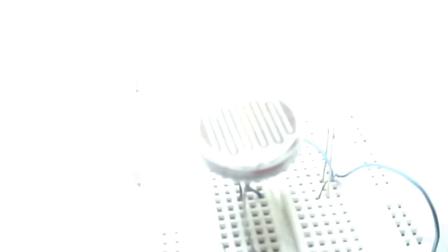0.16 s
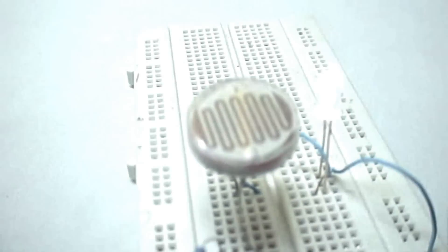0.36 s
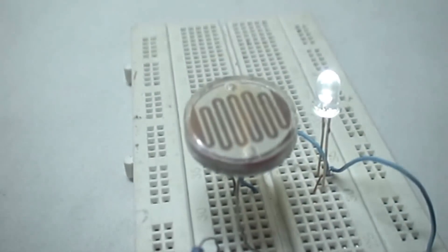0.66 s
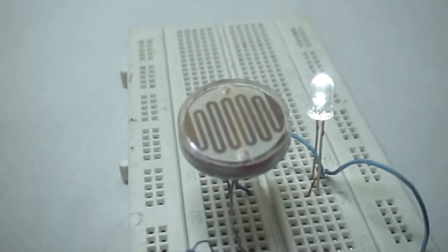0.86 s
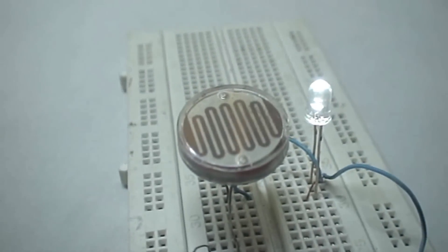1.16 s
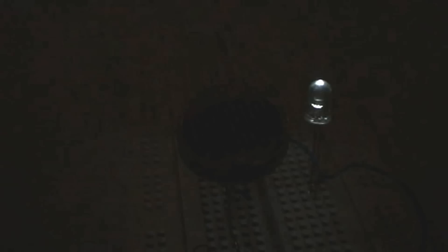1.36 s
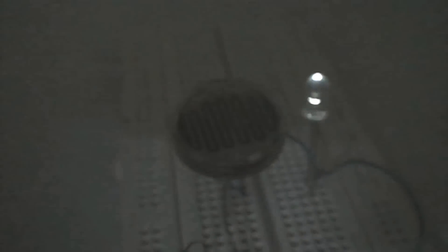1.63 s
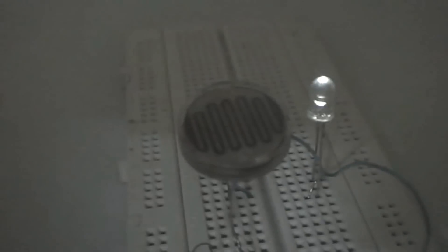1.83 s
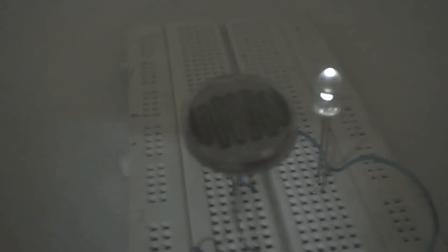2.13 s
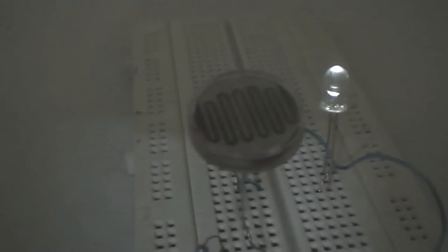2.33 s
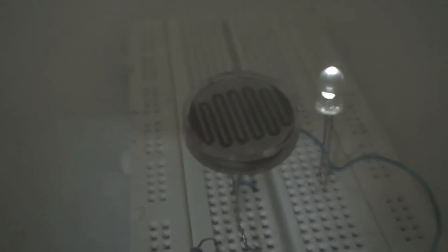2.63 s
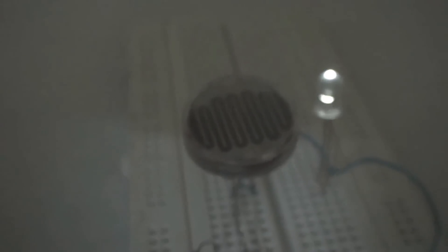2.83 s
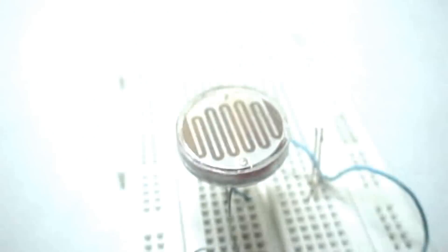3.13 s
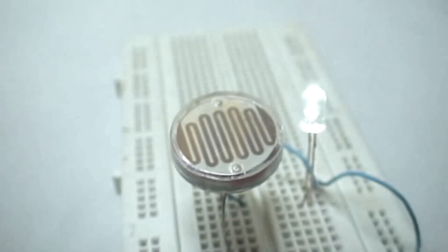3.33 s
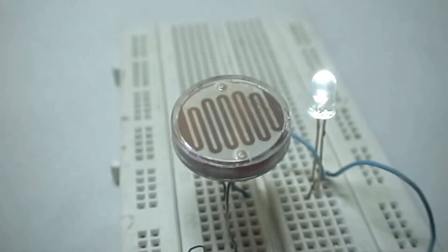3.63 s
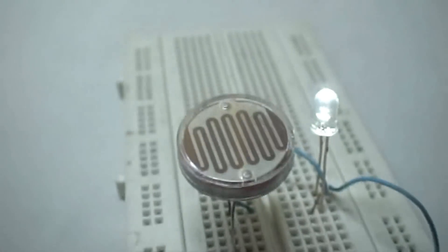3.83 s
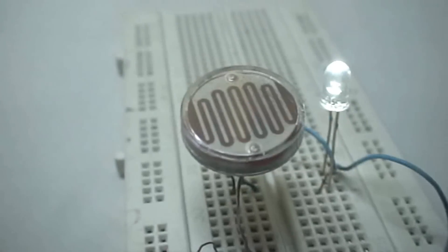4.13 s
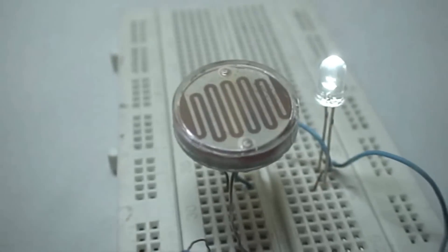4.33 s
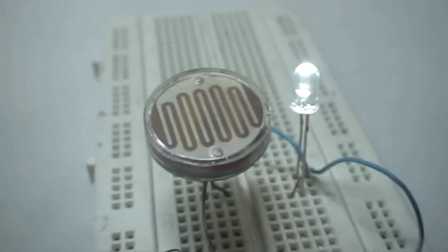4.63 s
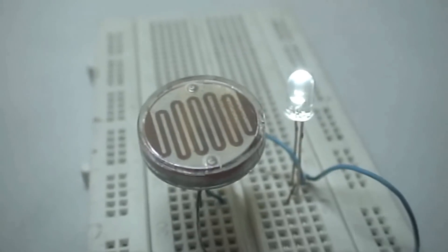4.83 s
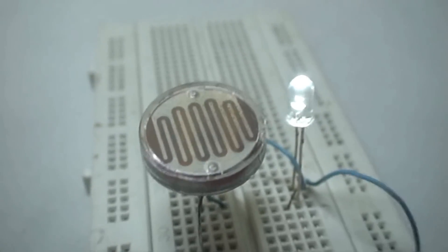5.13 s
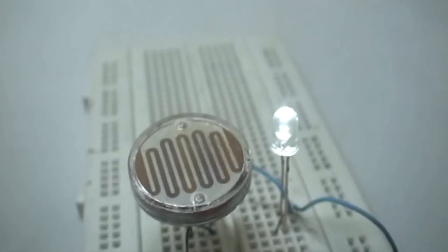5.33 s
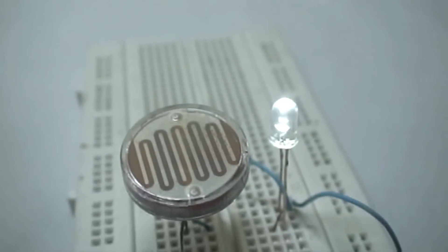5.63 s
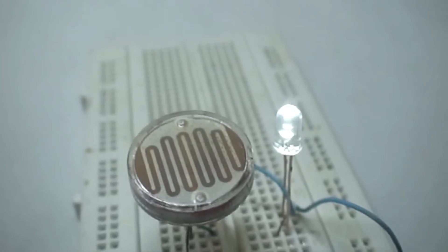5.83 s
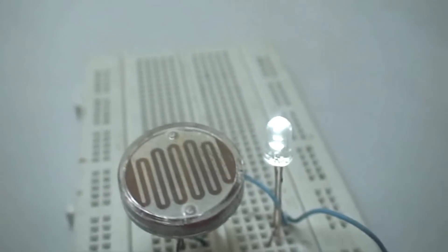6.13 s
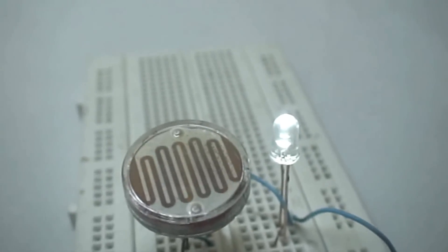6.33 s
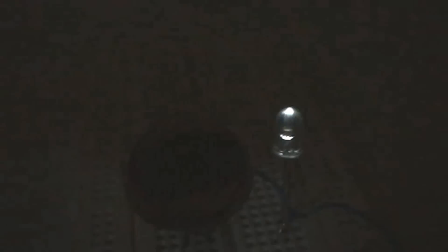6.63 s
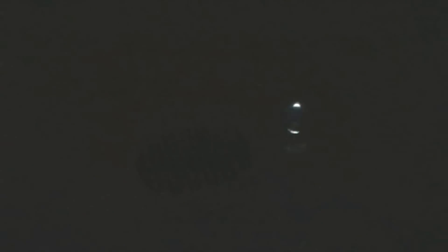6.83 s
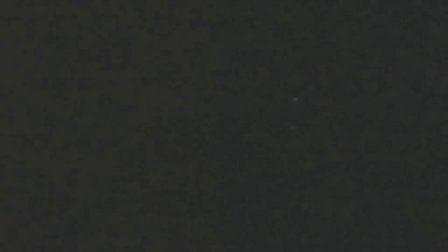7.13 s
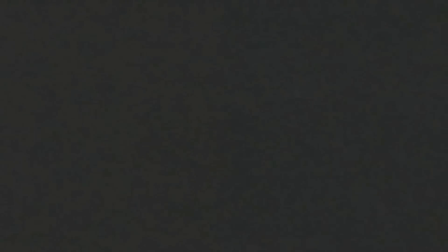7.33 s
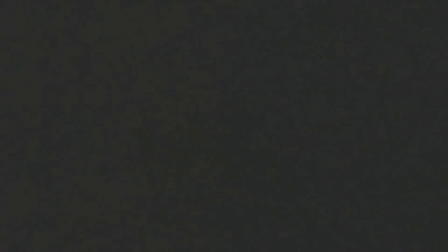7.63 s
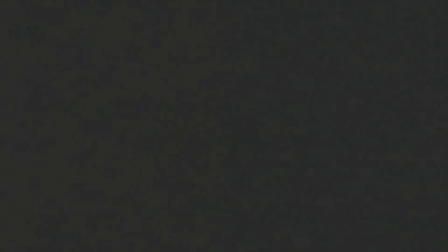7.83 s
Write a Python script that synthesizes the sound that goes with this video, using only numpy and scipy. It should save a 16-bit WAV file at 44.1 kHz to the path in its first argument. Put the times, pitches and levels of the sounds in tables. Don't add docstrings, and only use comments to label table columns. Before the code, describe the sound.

In a quiet hissy room, a nearby switch snaps sharply on and eases off, while farther wall clicks echo amid small desk knocks.

```python
import sys
import numpy as np
from scipy import signal
from scipy.fft import rfft, irfft, next_fast_len
from scipy.io import wavfile
from scipy.ndimage import uniform_filter1d

SR = 44100
rng = np.random.default_rng(int(sys.argv[2]) if len(sys.argv) > 2 else 0)


def wav_out(sig):
    wavfile.write(sys.argv[1], SR, np.round(np.clip(np.atleast_2d(sig).T, -1, 1) * 32767).astype(np.int16))


def natural_amplitude(level_db):
    exponent = np.asarray(level_db, float) / 20
    return 10 ** exponent


N = 352359

# (time [s], level [dB])
HISS_SWELL = [(0, 2.5), (1.5, 1), (2.9, 2.5), (4.2, 0), (5.5, 1.5), (7.5, 2.5)]
# (frequency [Hz], level [dB per Hz])
ROOM_TONE = [(25, -23), (76, -19), (130, 0.5), (200, -8.5), (300, -6.5), (575, -7.5), (1500, -14.5),
             (16000, -40)]
# (frequency [Hz], level [dB per Hz])
MIC_NOISE = [(2000, -40.5), (7000, -28.5), (11000, -29.5), (15800, -26.5)]
# (frequency [Hz], width [Hz], level [dB rms])
ROOM_MODES = [(61.5, 38, -74.5), (97.5, 6.5, -71), (129.5, 12, -69), (194, 4.4, -70.5), (600, 85, -70)]
# (frequency [Hz], likeness [0-1])
HISS_LIKENESS = [(100, 1), (220, 0.48), (400, 0.99), (650, 0.52), (1000, .32), (2000, 0.42), (5000, 0.11),
                 (9000, .03)]
# (frequency [Hz], likeness [0-1])
CLICK_LIKENESS = [(300, 1), (2000, 0.62), (5000, 0.91), (9000, 0.43), (14000, 0.19)]
# (frequency [Hz], time to fall 60 dB [s])
ROOM_DECAY = [(250, 0.44), (660, 0.3), (1740, 0.36), (4590, 0.34), (12100, 0.27)]

# (time [s], slot whine [Hz])
FAN_SPEED = [(0, 1422), (.5, 1427), (1.4, 1424), (1.65, 1438), (2.1, 1423), (2.55, 1430), (2.95, 1416),
             (3.2, 1432), (3.7, 1417), (3.95, 1429), (4.25, 1432), (4.95, 1420), (5.33, 1443), (5.75, 1426),
             (6.0, 1423), (6.25, 1433), (7.0, 1423), (7.99, 1425)]
# (multiple of the shaft speed [-], level [dB])
FAN_ORDERS = [(36, 0.5), (37, -7.5), (360, -15)]
# (time [s], hum [Hz], level [dB rms])
VEHICLE = [
    (4.9, 163, -78),
    (5.5, 163.8, -62),
    (6.2, 163.7, -63.5),
    (6.7, 168, -62),
    (7.1, 185.4, -66.5),
    (7.6, 199.2, -76),
    (7.99, 200, -72),
]

# (time [s], peak [dB], centre [Hz], left minus right [dB])
TICKS = [(.2712, -43, 4440, .5), (1.046, -54, 3370, 4), (1.047, -44, 1780, 1), (1.6442, -50.5, 2400, -1),
         (2.9447, -46, 1990, 7), (3.009, -46, 5000, 9), (3.5486, -44, 1290, -1), (6.8004, -38, 3300, 1),
         (6.8, -33.5, 1330, 1), (7.9688, -44.5, 900, 3)]
# (time [s], peak [dB], centre [Hz], left minus right [dB])
PINGS = [
    (.158, -27, 14000, 5),
    (.2712, -37.5, 1570, .5),
    (3.137, -41, 13000, 0),
    (4.056, -50, 816, -4),
    (5.313, -58, 5400, -4),
]
# (time [s], peak [dB], pitch [Hz], time to fall 60 dB [s], left minus right [dB])
SQUEAKS = [
    (2.168, -65, 4900, 0.26, 2),
    (2.27, -69, 6200, .1, 2),
    (3.5478, -47.5, 3600, .04, 5),
    (5.266, -63, 5150, .04, -6),
]
# (time [s], peak [dB], start [Hz], end [Hz], time to fall 60 dB [s])
KNOCKS = [
    (0.274, -44.5, 348, 350, 0.1),
    (3.068, -42, 300, 300, .06),
    (6.584, -41, 320, 340, 0.045),
    (6.732, -31, 368, 280, 0.061),
    (6.74, -37.5, 198, 165, 0.071),
    (6.807, -32.5, 392, 470, 0.046),
    (6.812, -43, 600, 600, .06),
]

# (time [s], peak [dB], finger lands earlier by [s], direct sound [dB])
WALL = [
    (4.408, -25, 0.006, -2),
    (5.8117, -19, 0.0044, -18),
    (6.9328, -28, 0.0074, -12),
]
# (frequency [Hz], level [dB per Hz])
WALL_COLOUR = [
    [(150, -35), (400, 0), (3000, -4), (4150, -30), (5500, -1.5), (13500, -24), (15000, -38)],
    [(100, -12), (180, 1.5), (1000, -3.5), (5000, -5), (10000, -1.5), (16000, -10)],
    [(150, -35), (500, 2), (3000, -4), (6500, -8), (13000, -19), (15000, -30)],
]
# (frequency [Hz], width [Hz], level [dB])
WALL_RINGS = [
    [(340, 58, 3), (1360, 370, 1), (2160, 270, 4.5), (2700, 110, 4.5), (3483, 310, 7), (4800, 310, -2),
     (6900, 700, -5.5), (8540, 560, 3.5), (9440, 540, -1), (12600, 1400, -11)],
    [(340, 25, 0), (620, 82, -1), (1380, 160, -1.5), (2160, 1100, -1.5), (3300, 990, -6), (4400, 700, -2),
     (6500, 1100, -4), (8860, 1400, -4), (12800, 1600, -13.5)],
    [(1460, 350, 1), (2320, 250, 4), (2910, 420, 4.5), (3880, 340, 1.5), (5300, 420, -7.5), (8400, 1100, 3),
     (9500, 390, -2), (12600, 1000, -9)],
]
# (frequency [Hz], width [Hz], depth [0-1])
WALL_NOTCH = [
    (4150, 330, .92),
    (5500, 300, .2),
    (4670, 360, 0.53),
]

# (time [s], peak [dB], left minus right [dB])
LAMP_ON = [
    (0.1601, -8, 2),
    (3.017, -6.5, 3),
]
# (frequency [Hz], level [dB per Hz])
LAMP_ON_COLOUR = [
    [(400, -41), (800, -19), (4000, -5), (5500, -12), (7000, -10), (16000, -12.5)],
    [(400, -31), (800, -3.5), (4000, -17), (5800, -7), (9000, -10), (16000, -8)],
]
# (frequency [Hz], width [Hz], level [dB])
LAMP_ON_RINGS = [
    [(1170, 550, -3.5), (2870, 860, -5.5), (4900, 670, 0.5), (6780, 520, -2), (8700, 600, -9),
     (10230, 660, -5), (13000, 560, -1.5), (14200, 500, -10)],
    [(1420, 340, -2.5), (2770, 300, 0.5), (3600, 430, -5.5), (4700, 690, -1.5), (7000, 760, -5.5),
     (10270, 300, 3), (13300, 650, -5), (14400, 360, -27.5)],
]
# (frequency [Hz], width [Hz], depth [0-1])
LAMP_ON_NOTCH = [
    (5850, 620, 0.8),
    (5820, 400, 0.7),
]
# (time [s], peak [dB], left minus right [dB])
LAMP_OFF = [
    (1.4177, -35.5, 2.2),
    (6.6976, -29, 1.7),
]
# (frequency [Hz], level [dB per Hz])
LAMP_OFF_COLOUR = [(400, -17), (800, -20), (2200, 0.5), (5000, -25), (16000, -23)]
# (frequency [Hz], width [Hz], level [dB])
LAMP_OFF_RINGS = [(980, 170, -2.5), (1850, 600, 2.5), (3600, 1300, -12), (6580, 560, -8.5),
                  (8700, 700, -12), (12700, 1500, -30)]
# (frequency [Hz], level [dB], time to fall 60 dB [s])
LAMP_BODY = [(72.6, -8.5, 0.37), (141, -1.5, 0.1), (163, -24.5, 0.79), (267, -9.5, 0.18), (345, -2.5, 0.11),
             (416, -2, 0.13), (734, -16, 0.28)]

# (frequency [Hz], lead [radians])
MIC_LEAD = [(30, 0.18), (100, 0.36), (220, 0.92), (400, 1.75), (1000, 1.79), (3000, 1.54), (5500, 0.84),
            (10000, 0.75)]
# (frequency [Hz], left minus right [dB])
MIC_BALANCE = [(60, -4), (250, 1), (4000, -1), (11000, -0.7)]


def evened(x):
    return x / np.sqrt(np.mean(x ** 2) + 1e-20)


def peaked(x):
    return x / np.abs(x.mean(0)).max()


def read(points, hz):
    f, value = np.transpose(points)
    return np.interp(np.log(hz + 1), np.log(f + 1), value, left=value[0], right=value[-1])


def follow(rows):
    s, *columns = np.transpose(rows)
    return [np.interp(np.arange(N) / SR, s, c) for c in columns]


def add(mix, s, sound):
    part = mix[:, round(s * SR):][:, :sound.shape[1]]
    part += sound[:, :part.shape[1]]


def panned(x, pan_db):
    return x * natural_amplitude(np.array([[pan_db / 2], [-pan_db / 2]]))


def paired(x, likeness):
    c = np.clip(read(likeness, np.fft.rfftfreq(x.shape[1], 1 / SR)), 0, 1)
    left, other = rfft(x, axis=1)
    right = c * left + np.sqrt(1 - c ** 2) * other
    return irfft(np.array([left, right]), x.shape[1], axis=1)


def wander(size):
    once = uniform_filter1d(rng.standard_normal(N), size=size)
    return evened(uniform_filter1d(once, size=size))


def coloured(x, colour, rings, valley_db):
    hz = np.abs(np.fft.fftfreq(4096, 1 / SR))
    peaks = sum((natural_amplitude(db) / (1 + 2 * ((hz - f) / w) ** 2)) ** 2 for f, w, db in rings)
    broad = natural_amplitude(np.maximum(read(colour, hz) + valley_db, -90)) ** 2
    log_gain = np.log(broad + peaks) / 2
    phase = signal.hilbert(log_gain).imag
    taps = np.fft.ifft(np.exp(log_gain - 1j * phase)).real[:2048]
    return signal.fftconvolve(x, taps[None], axes=1)


def notched(x, hz, width, depth):
    band = signal.lfilter(*signal.iirpeak(hz, hz / width, fs=SR), x, axis=1)
    return x - np.clip(depth, 0, 1) * band


def rattle(t60, rise):
    t = np.arange(6000) / SR
    spikes = natural_amplitude(2.5 * rng.standard_normal(6000))
    noise = paired(rng.standard_normal((2, 6000)), CLICK_LIKENESS) * spikes
    z = rfft(noise * (1 - np.exp(-t / rise)) * natural_amplitude(-60 * t / t60), axis=1)
    z = z / np.sqrt(uniform_filter1d(np.abs(z) ** 2, size=70, axis=1))
    fade_out = np.clip((t[-1] - .01 - t) / .02, 0, 1)
    return evened(irfft(z, 6000, axis=1) * fade_out)


def ring(hz, end_hz, t60, rise):
    t = np.arange(20000) / SR
    glide = end_hz + (hz - end_hz) * np.exp(-t / 0.028)
    return np.sin(2 * np.pi * np.cumsum(glide) / SR) * natural_amplitude(-60 * t / t60) * (1 - np.exp(-t / rise))


def room(gap, build):
    noise = paired(rng.standard_normal((2, 30000)), CLICK_LIKENESS)
    hz, t, z = signal.stft(noise, SR, nperseg=128)
    rise = 1 - np.exp(-(t + 0.0013) / (build * (1 + 2500 / (hz[:, None] + 300))))
    clumps = uniform_filter1d(rng.standard_normal(z.shape[1:]), size=4, axis=0)
    clumps_db = 2 * evened(uniform_filter1d(clumps, size=3, axis=1))
    decay = natural_amplitude(-60 * t / read(ROOM_DECAY, hz)[:, None])
    tail = signal.istft(z * rise * natural_amplitude(clumps_db) * decay, SR, nperseg=128)[1]
    return np.pad(tail / np.linalg.norm(tail[0]), ((0, 0), (round(gap * SR), 0)))


def hiss():
    hz = np.fft.rfftfreq(N, 1 / SR)
    colour = np.hypot(natural_amplitude(read(ROOM_TONE, hz)), natural_amplitude(read(MIC_NOISE, hz))) * (hz < 15880)
    air = irfft(rfft(rng.standard_normal((2, N)), axis=1) * colour, N, axis=1)
    air = natural_amplitude(-58.5) * evened(paired(air, HISS_LIKENESS))
    for f, width, db in ROOM_MODES:
        r = np.exp(-np.pi * width / SR)
        poles = [1, -2 * r * np.cos(2 * np.pi * f / SR), r * r]
        air = air + natural_amplitude(db) * evened(signal.lfilter([1, 0, -1], poles, rng.standard_normal(N)))
    return natural_amplitude(follow(HISS_SWELL)[0]) * air


def fan():
    t = np.arange(N) / SR
    hunt_hz, hunts_per_s = 2.2, 2.6
    slot_hz = follow(FAN_SPEED)[0] + hunt_hz * np.cos(2 * np.pi * hunts_per_s * (t - .5))
    shaft = 2 * np.pi * np.cumsum(uniform_filter1d(slot_hz / 36, size=3000)) / SR
    fan_db = -71 + 0.87 * wander(5000)
    lag = np.array([[0], [.6]])
    whine = sum(natural_amplitude(fan_db + db) * np.sin(round(k) * shaft + lag) for k, db in FAN_ORDERS)
    whistle = natural_amplitude(-88.5) * np.sin(2 * np.pi * 14310 * t)
    return np.sqrt(2) * (panned(whine, 9.5) + whistle)


def vehicle():
    hz, db = follow(VEHICLE)
    flutter_db = 2 * wander(3000)
    return np.sqrt(2) * natural_amplitude(db + flutter_db) * np.sin(2 * np.pi * np.cumsum(hz) / SR)


def sleeve(mix):
    length_s, rise_s = .22, 0.068
    t = np.arange(0, length_s, 1 / SR)
    hz = 1780 + 386 * np.minimum(t / (2 * rise_s), 1)
    cloth = uniform_filter1d(rng.standard_normal((2, 20000)), size=70, axis=1)[:, :len(t)]
    turning = np.exp(2j * np.pi * np.cumsum(hz) / SR)
    whisper = evened((turning * (cloth[0] + 1j * cloth[1])).real)
    stroke = np.minimum(t / rise_s, 1) ** 2 * np.minimum((length_s - t) / .02, 1)
    add(mix, 4.2, natural_amplitude(-64.5) * stroke * whisper * np.ones((2, 1)))


def tick(mix, s, db, hz, width, t60, pan_db):
    touch = rattle(t60, 0.00059)
    touch[:, 8] += 12.
    sound = coloured(touch, [(100, -40), (800, -3), (16000, -18)], [(hz, width, 0)], valley_db=-23)
    add(mix, s, panned(natural_amplitude(db) * peaked(sound), pan_db))


def fingers(mix):
    for rows, spread in ((TICKS, 1.05), (PINGS, 0.31)):
        for s, db, hz, pan_db in rows:
            t60 = 0.058 / (1 + (hz / 9000) ** 2)
            tick(mix, s, db, hz, spread * hz, t60, pan_db)
    for s, db, hz, t60, pan_db in SQUEAKS:
        tick(mix, s, db, hz, 13 / t60, t60, pan_db)
    for s, db, hz, end_hz, t60 in KNOCKS:
        add(mix, s, natural_amplitude(db) * ring(hz, end_hz, t60, 0.0016) * np.ones((2, 1)))


def wall(mix, row, colour, rings):
    s, db, lead, direct_db = row
    heard = room(lead, 0.0012)
    add(heard, lead, natural_amplitude(direct_db - 50.0) * rattle(0.028, 0.0016))
    finger = natural_amplitude(-12) * room(0, 0.00067)
    add(heard, 0, finger)
    heard = coloured(heard, colour, rings, valley_db=-7.0)
    add(mix, s - lead, panned(natural_amplitude(db) * peaked(heard), -.5))


def lamp(mix, row, colour, rings, t60, housing_db, thump_db, room_db):
    s, db, pan_db = row
    housing = signal.lfilter(*signal.butter(2, 3500, fs=SR), rattle(3.5 * t60, 0.0043))
    strike = rattle(t60, 0.00052) + natural_amplitude(housing_db) * housing
    snap = coloured(strike, colour, rings, valley_db=-1.5)
    gain = natural_amplitude(db) / np.abs(snap.mean(0)).max()
    add(mix, s, panned(gain * snap, pan_db))
    slap = coloured(rattle(t60, .001), colour, rings, valley_db=-3.0)
    add(mix, s + 0.02, natural_amplitude(-22) * gain * slap)
    thump = sum(natural_amplitude(level_db) * ring(hz, hz, decay, 0.0021) for hz, level_db, decay in LAMP_BODY)
    add(mix, s + 0.00327, natural_amplitude(db + thump_db) * np.array([thump, thump]))
    echo = np.linalg.norm(strike[0]) * coloured(room(0.023, 0.0015), colour, rings, valley_db=-2.5)
    add(mix, s, gain * natural_amplitude(room_db) * echo)


def scene():
    mix = hiss() + fan() + vehicle()
    for row, colour, rings, notch in zip(LAMP_ON, LAMP_ON_COLOUR, LAMP_ON_RINGS, LAMP_ON_NOTCH):
        click = np.zeros((2, N))
        lamp(click, row, colour, rings, t60=0.03, housing_db=-2, thump_db=-25, room_db=-16.5)
        mix = mix + notched(click, *notch)
    for row in LAMP_OFF:
        lamp(mix, row, LAMP_OFF_COLOUR, LAMP_OFF_RINGS, t60=.0235, housing_db=-3.5, thump_db=-13, room_db=-16)
    for row, colour, rings, notch in zip(WALL, WALL_COLOUR, WALL_RINGS, WALL_NOTCH):
        click = np.zeros((2, N))
        wall(click, row, colour, rings)
        mix = mix + notched(click, *notch)
    fingers(mix)
    sleeve(mix)
    return mix


def roll_off(x):
    return signal.sosfilt(signal.butter(12, 16710, fs=SR, output="sos"), x)


def record(dry):
    power_db = 10 * np.log10(signal.lfilter([.002], [1, -.998], (dry ** 2).mean(0)) + 1e-12)
    fall_db = np.arange(N) * 7.0 / SR
    held_db = np.maximum.accumulate(power_db + fall_db) - fall_db
    over_db = np.maximum(held_db + 30, 0)
    levelled = dry / natural_amplitude(0.34 * over_db)

    size = next_fast_len(N + 4000)
    hz = np.fft.rfftfreq(size, 1 / SR)
    tilt = natural_amplitude(read(MIC_BALANCE, hz) / 2) * np.exp(.5j * read(MIC_LEAD, hz))
    left, right = rfft(levelled, size, axis=1) * np.array([tilt, 1 / tilt])
    top = hz > 11250
    mid = (left + right) / 2 * np.where(top, natural_amplitude(2.5), 1)
    side = (left - right) / 2 * np.where(top, natural_amplitude(-12.5), 1)

    low_cut = 1 / np.hypot(1, (45 / (hz + 1)) ** 3)
    high_cut = np.interp(hz, [15800, 16050, 16400, 16650], [1, .08, .08, 0])
    stereo = np.array([mid + side, mid - side]) * low_cut * high_cut
    return roll_off(irfft(stereo, size, axis=1)[:, :N])


dry = scene()
out = record(dry)
wav_out(out)
```